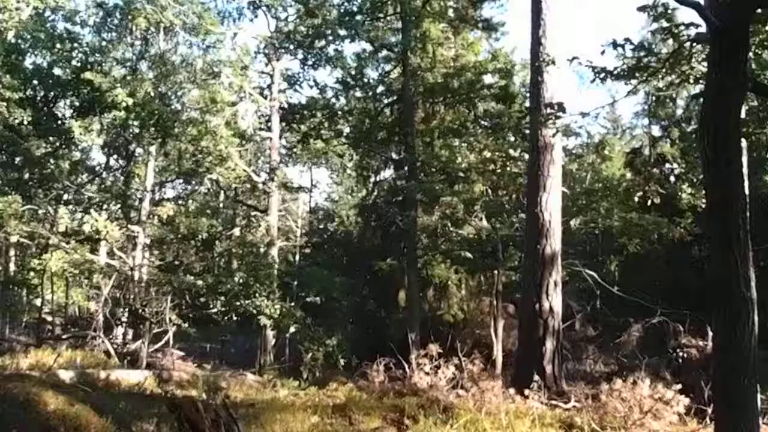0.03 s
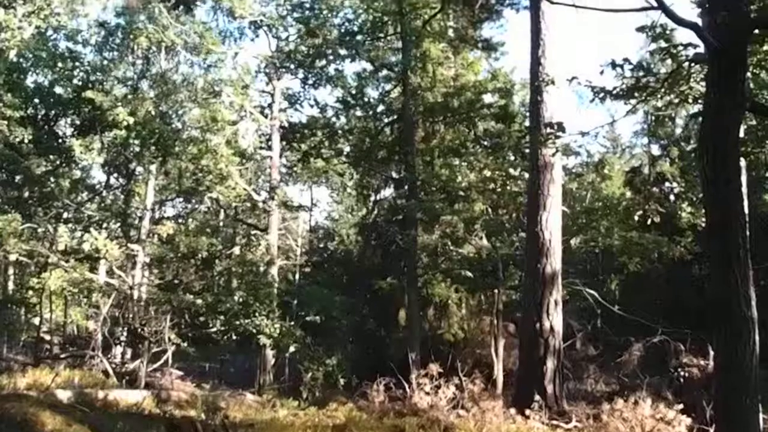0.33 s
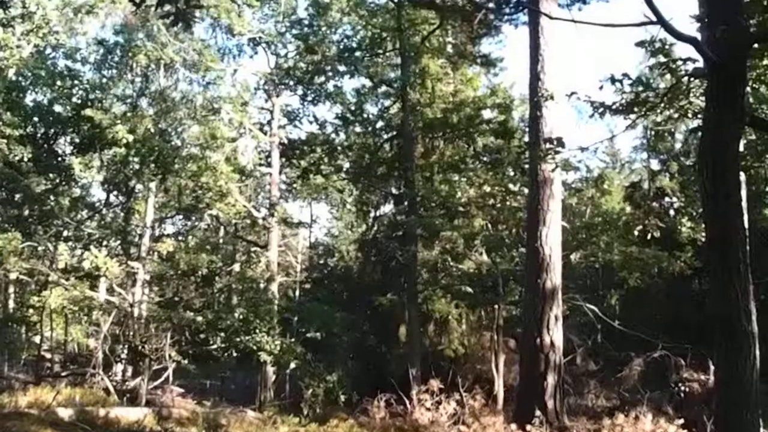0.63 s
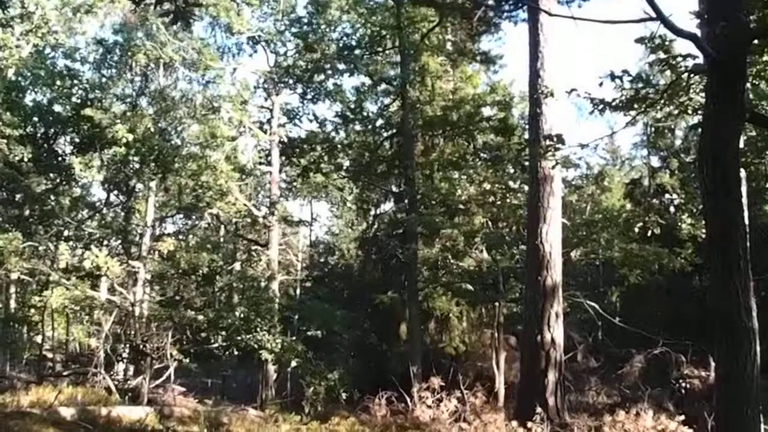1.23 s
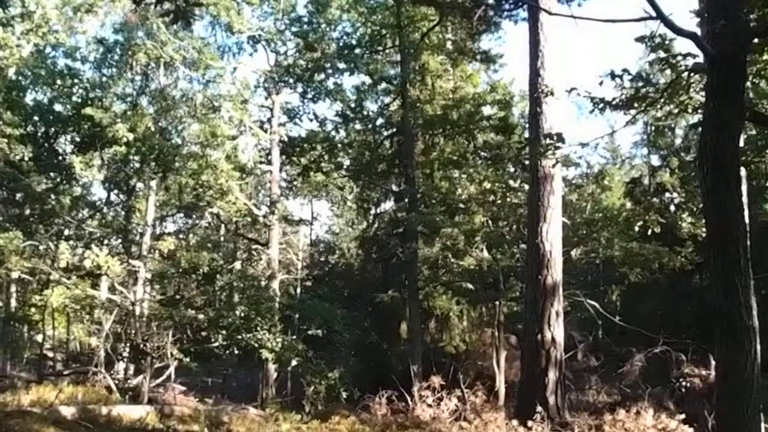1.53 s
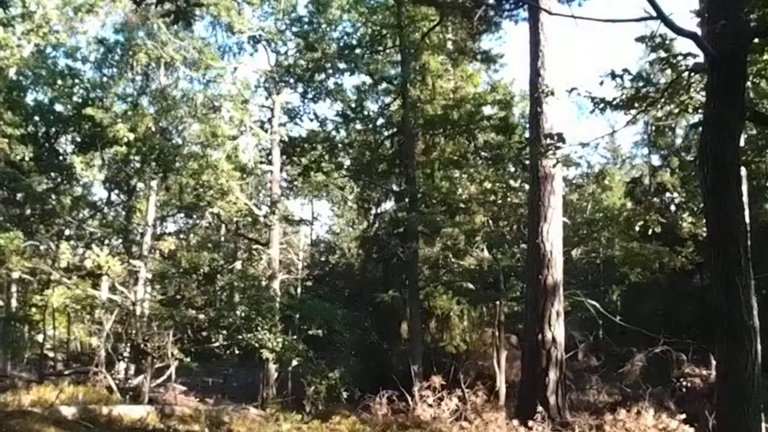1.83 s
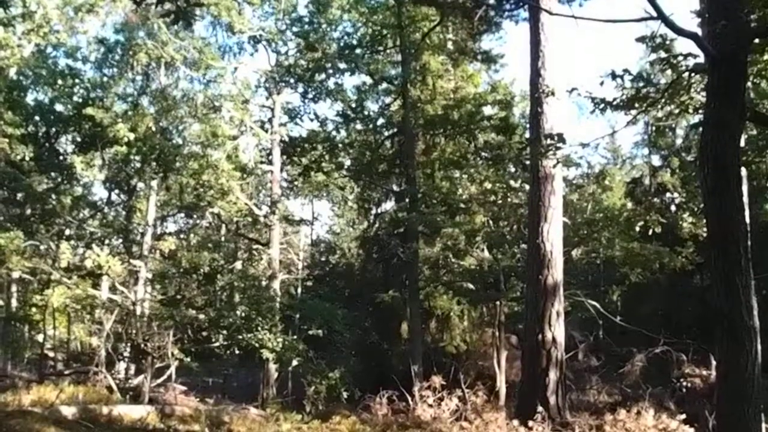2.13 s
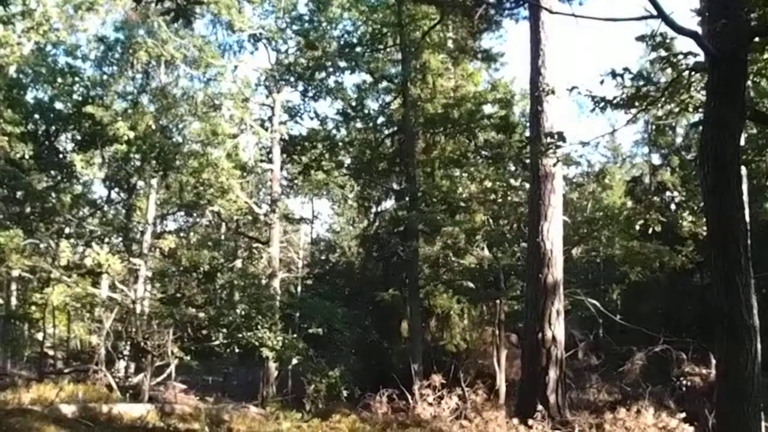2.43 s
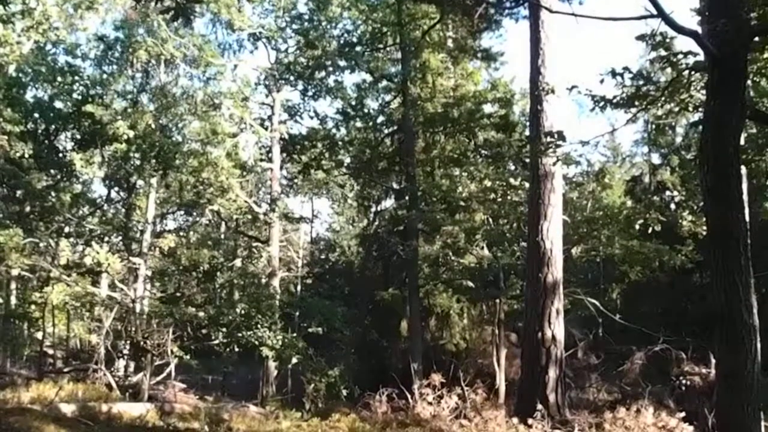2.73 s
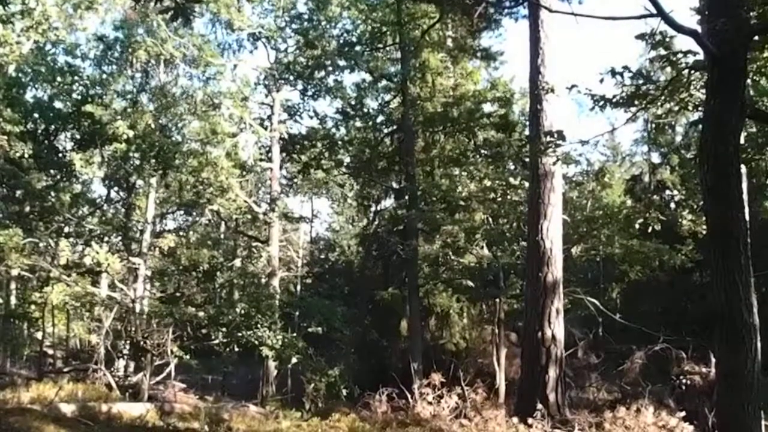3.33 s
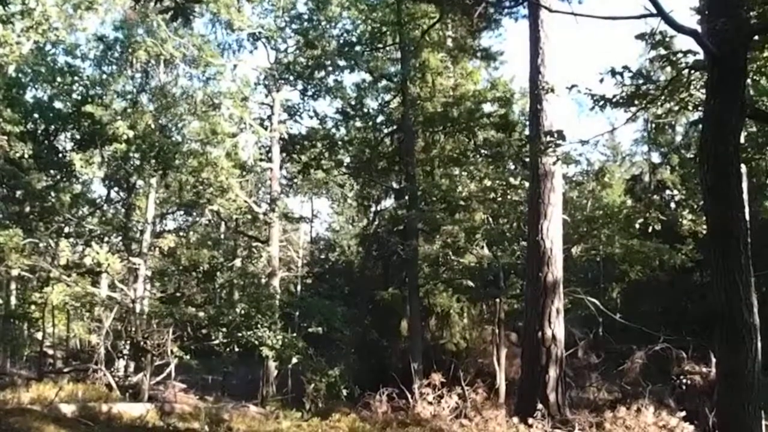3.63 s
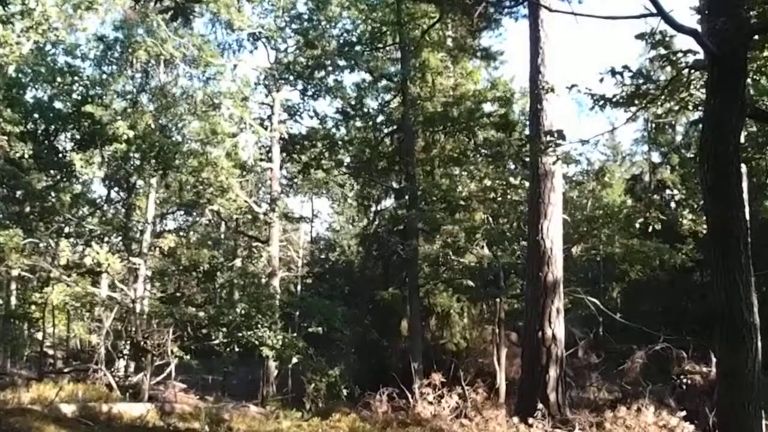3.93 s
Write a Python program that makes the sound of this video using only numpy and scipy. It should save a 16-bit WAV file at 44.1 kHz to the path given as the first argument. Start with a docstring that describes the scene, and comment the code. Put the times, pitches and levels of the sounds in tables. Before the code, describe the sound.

A single drawn-out bird of prey call rises quickly, holds a high, clear pitch and drops, echoing briefly off tree trunks. Soft wind and steady recorder hiss run beneath, with one tiny nearby tick before the call and another during it.

```python
"""A goshawk wails once in a forest: its voice flicks up, holds a clear note and falls away.
Trunks scatter the call into a short tail. Faint wind murmurs in the trees; two small ticks sound nearby.
The recorder starts a moment late and adds its own hiss and a thin high whine."""
import sys
import numpy as np
from scipy import signal
from scipy.fft import rfft, irfft
from scipy.io import wavfile

SR = 44100
rng = np.random.default_rng(int(sys.argv[2]) if len(sys.argv) > 2 else 0)


def digitize_waveform(pressure):
    """Quantize a signal to 16-bit integers and store it at the path in sys.argv[1].

    Rows of a 2-D input are taken as channels; values are limited to [-1, 1].
    """
    field = np.atleast_2d(pressure).T
    bounded = np.clip(field, -1, 1)
    quanta = np.round(bounded * 32767).astype(np.int16)
    wavfile.write(sys.argv[1], SR, quanta)


N = 176400
TIME_S = np.arange(N) / SR

# Noise spectra: f/Hz, relative density/dB
WIND_SPECTRUM = [(20, -49), (40, -21), (58, -4.5), (90, -5.5), (140, -4.5), (230, -3.5), (420, -7),
                 (650, -3), (890, 1), (1080, -5.5), (1400, -8.5), (1900, -18.5), (3500, -26.5), (8000, -67)]
HISS_SPECTRUM = [(1000, 2.5), (2500, 1), (4500, 0.5), (5600, -1), (7200, -2.5), (8300, -5.5), (9500, -13.5),
                 (10800, -11), (12100, -18), (13400, -8), (14500, -5.5), (15700, -7.5)]
TICK_SPECTRUM = [(800, -18), (2000, 6), (3200, 4), (4600, -12), (7000, 2), (10000, -13), (15000, -15)]
# Tick onsets: t/s, level/dB
TICK_ONSETS = [(1.045, -48.5), (2.639, -54)]
# Voice pitch in the opening flick, held note and closing fall: t/s, f/Hz
FLICK_PITCH = [(2.443, 1400), (2.451, 1465), (2.470, 1615), (2.478, 1765), (2.483, 1792), (2.489, 1750),
               (2.494, 1565), (2.512, 1503)]
HOLD_PITCH = [(2.535, 1483), (2.899, 1515), (3.121, 1522), (3.299, 1508), (3.335, 1498)]
FALL_PITCH = [(3.352, 1466), (3.362, 1438), (3.370, 1365), (3.378, 1215), (3.387, 1100), (3.398, 960)]
# Envelopes of harmonics 1, 2, 3 and 5: t/s, level/dB
H1_ENVELOPE = [(2.444, -70), (2.479, -44.5), (2.492, -48.5), (2.512, -63), (2.62, -55.5), (2.70, -63.5),
               (2.86, -61), (3.16, -76.5), (3.28, -55), (3.36, -59)]
H2_ENVELOPE = [(2.444, -43), (2.449, -63), (2.458, -47.5), (2.474, -44), (2.480, -33.5), (2.489, -36),
               (2.496, -38.5), (2.508, -51), (2.525, -46.5), (2.63, -44.5), (2.70, -46.5), (2.84, -47),
               (2.885, -54), (3.02, -56), (3.11, -50.5), (3.145, -58.5), (3.28, -53), (3.34, -45),
               (3.362, -49), (3.372, -60)]
H3_ENVELOPE = [(2.444, -54), (2.456, -57), (2.472, -57), (2.483, -66), (2.496, -52), (2.62, -54),
               (3.05, -55.5), (3.11, -51), (3.165, -52), (3.195, -57.5), (3.33, -54), (3.372, -57.5)]
H5_ENVELOPE = [(2.48, -80), (2.57, -78), (2.70, -72.5), (2.9, -73.5), (3.07, -76), (3.15, -82), (3.21, -71),
               (3.27, -69), (3.35, -81)]
# Faint harmonics tracking the third: harmonic number, level/dB re third
UPPER_HARMONICS = [(4, -29), (6, -38), (7, -31.5)]
# Forest echo bands: f/Hz, level/dB, T60/s
ECHO_BANDS = [(1510, -1.5, 1.3), (1740, -8, 0.93), (3040, -10.5, 0.83), (3650, -9.5, 0.57),
              (4600, -10.5, 0.71), (7160, -4, 0.41)]
# Recorder notches: f/Hz, width/Hz
RECORDER_NOTCHES = [(5260, 200), (7730, 113)]


def from_db(db):
    """Decibels to gain."""
    return 10 ** (np.asarray(db) / 20)


def unit_rms(x):
    """Scale to unit power."""
    return x / np.sqrt(np.mean(x ** 2) + 1e-20)


def contour(rows):
    """Linear interpolation of (t/s, value) rows."""
    return np.interp(TIME_S, *np.transpose(sorted(map(tuple, rows))))


def drift(corner_hz):
    """Unit-RMS random wander: two-pole low-passed noise."""
    pole = np.exp(-2 * np.pi * corner_hz / SR)
    wander = signal.lfilter([1], [1, -2 * pole, pole * pole], rng.standard_normal(N + SR))
    return unit_rms(wander[SR:])


def coloured_noise(spectrum):
    """Unit-RMS noise with the given spectral shape."""
    hz, db = np.transpose(spectrum)
    bins_hz = np.maximum(np.fft.rfftfreq(N, 1 / SR), 1)
    gain = from_db(np.interp(np.log(bins_hz), np.log(hz), db))
    return unit_rms(irfft(rfft(rng.standard_normal(N)) * gain, N))


def wind(level_db=-53, flutter_db=0.42):
    """Air in the trees: a faint, even murmur."""
    return from_db(level_db + flutter_db * drift(corner_hz=5.7)) * coloured_noise(WIND_SPECTRUM)


def hiss(level_db=-62):
    """Steady recorder self-noise."""
    return from_db(level_db) * coloured_noise(HISS_SPECTRUM)


def whine(level_db=-71, pitch_hz=15482):
    """Thin electronic tone from the recorder."""
    return from_db(level_db) * np.sqrt(2) * np.sin(2 * np.pi * pitch_hz * TIME_S)


def ticks(decay_s=0.0033):
    """Dry noise bursts that die within milliseconds."""
    envelope = sum(from_db(db) * (TIME_S >= onset_s) * np.exp(-np.abs(TIME_S - onset_s) / decay_s)
                   for onset_s, db in TICK_ONSETS)
    return envelope * coloured_noise(TICK_SPECTRUM)


def goshawk(start_s=2.443, end_s=3.402, attack_s=0.0012, release_s=0.04):
    """Clear whistled voice: harmonics of one slightly unsteady pitch, rough at both ends."""
    since_s = np.maximum(TIME_S - start_s, 0)
    left_s = np.maximum(end_s - TIME_S, 0)
    jitter = 0.0013 * drift(corner_hz=54)
    rough_depth = 0.016 * np.exp(-since_s / 0.04) + 0.2 * np.exp(-left_s / 0.009)
    roughness = rough_depth * drift(corner_hz=900)
    pitch_hz = contour([*FLICK_PITCH, *HOLD_PITCH, *FALL_PITCH]) * (1 + jitter + roughness)
    phase = 2 * np.pi * np.cumsum(pitch_hz) / SR

    h1_db, h2_db, h3_db, h5_db = map(contour, (H1_ENVELOPE, H2_ENVELOPE, H3_ENVELOPE, H5_ENVELOPE))
    h4_db = h2_db.max() - 22 + 2.7 * (h2_db - h2_db.max())  # flares at the top of the flick
    harmonics = [(1, h1_db), (2, h2_db), (3, h3_db), (4, h4_db), (5, h5_db)]
    harmonics += [(round(k), h3_db + db) for k, db in UPPER_HARMONICS]
    voice = np.sqrt(2) * sum(from_db(db) * np.sin(k * phase) for k, db in harmonics)

    gate = np.minimum(since_s / attack_s, 1) * np.minimum(left_s / release_s, 1)
    shimmer_db = 0.05 * drift(corner_hz=37)
    return voice * gate * from_db(shimmer_db)


def forest_echo(call, delay_s=0.0041, build_s=0.0031, echoes_per_s=1500):
    """Many faint trunk reflections; the lowest band is strongest and lasts longest."""
    age_s = np.maximum(TIME_S - delay_s, 0)
    trunks = rng.standard_normal(N) * (rng.random(N) < echoes_per_s / SR)
    trunks *= 1 - np.exp(-age_s / build_s)
    bins_hz = np.fft.rfftfreq(N, 1 / SR)
    centres_hz = [row[0] for row in ECHO_BANDS]
    response = 0
    for selector, (_, db, t60_s) in zip(np.eye(len(ECHO_BANDS)), ECHO_BANDS):
        band = np.interp(bins_hz, centres_hz, selector)
        echoes = trunks * np.exp(-np.log(1000) * age_s / t60_s)
        response = response + from_db(db) * band * rfft(echoes / np.linalg.norm(echoes))
    return signal.fftconvolve(call, irfft(response, N))[:N]


def scene():
    """Call and echoes over wind, ticks and recorder noise; mono."""
    call = goshawk()
    return (call + forest_echo(call) + wind() + ticks() + hiss() + whine())[None]


def record(dry):
    """Recorder: late start with a short fade-in, two narrow notches, steep low-pass."""
    start_s, fade_from_db, fade_s, cutoff_hz = 0.235, -4.5, 0.048, 15750
    fade_db = fade_from_db * np.exp(-np.abs(TIME_S - start_s) / fade_s)
    out = dry * (TIME_S >= start_s) * from_db(fade_db)
    for hz, width_hz in RECORDER_NOTCHES:
        out = signal.lfilter(*signal.iirnotch(hz, hz / width_hz, fs=SR), out)
    lowpass = signal.ellip(16, 0.1, 80, cutoff_hz, fs=SR, output="sos")
    return signal.sosfilt(lowpass, out)


dry = scene()
out = record(dry)
digitize_waveform(out)
```